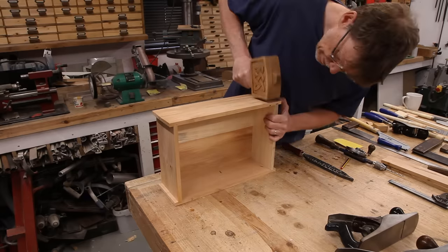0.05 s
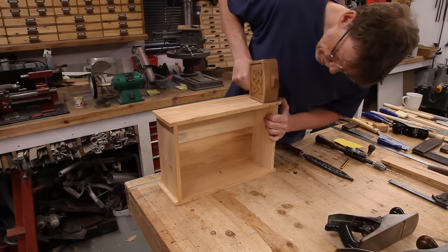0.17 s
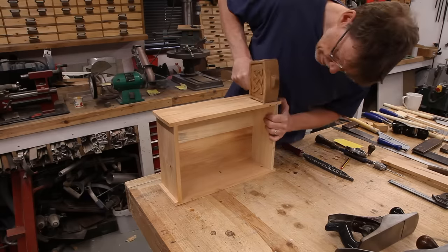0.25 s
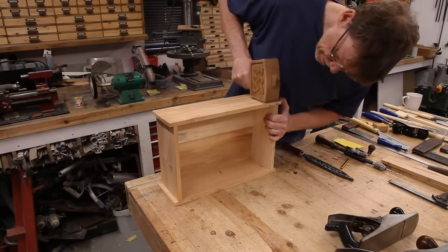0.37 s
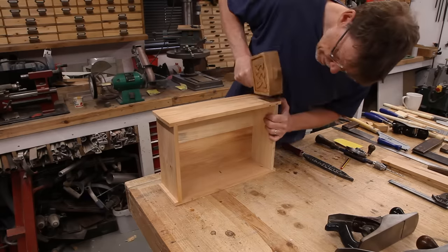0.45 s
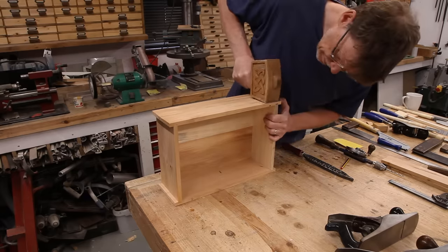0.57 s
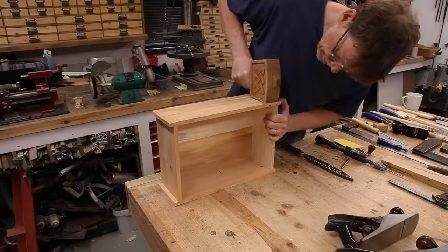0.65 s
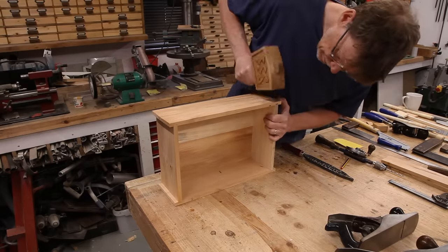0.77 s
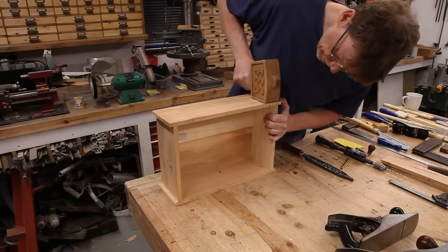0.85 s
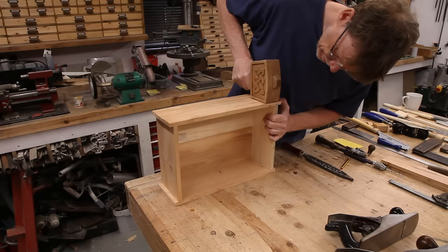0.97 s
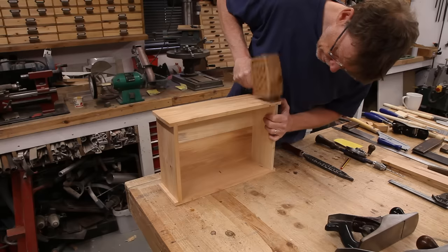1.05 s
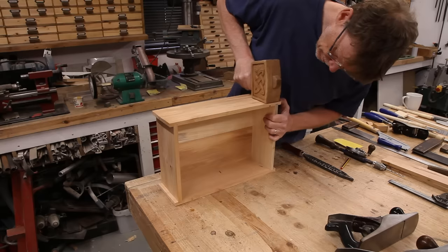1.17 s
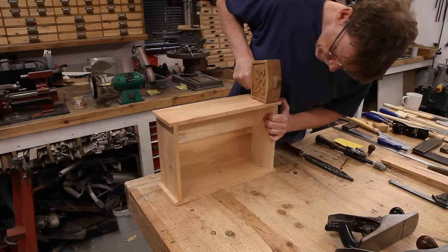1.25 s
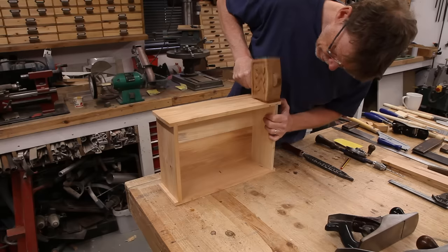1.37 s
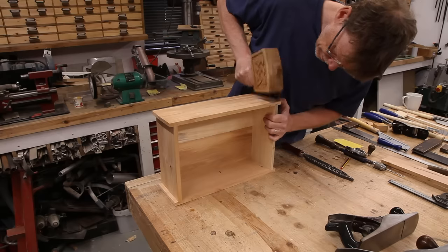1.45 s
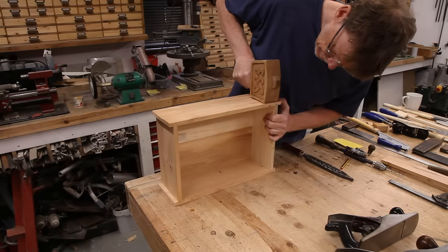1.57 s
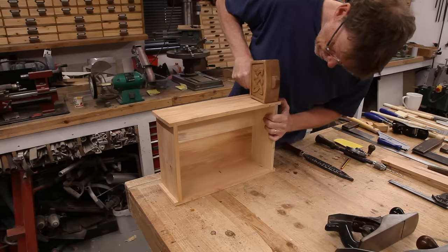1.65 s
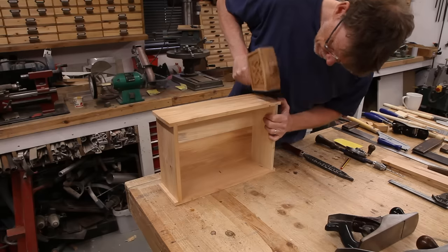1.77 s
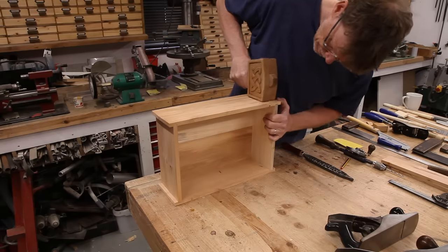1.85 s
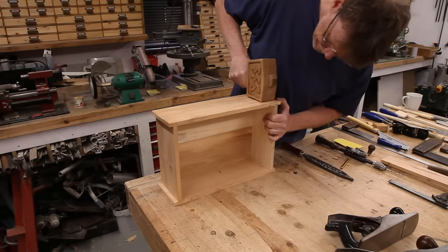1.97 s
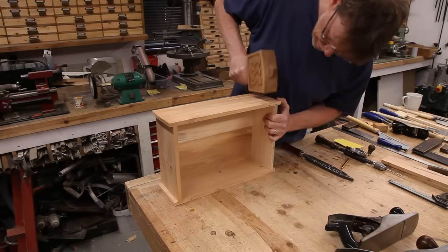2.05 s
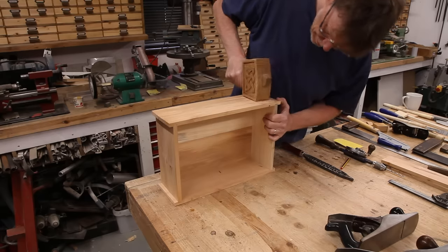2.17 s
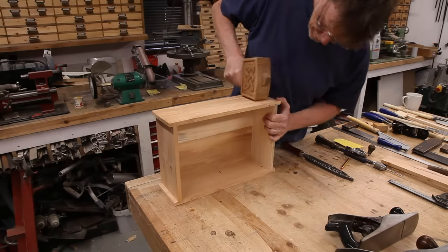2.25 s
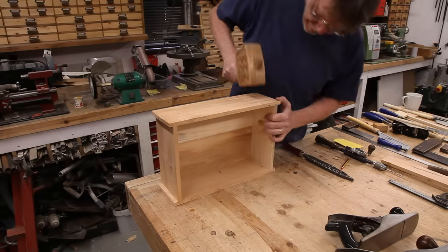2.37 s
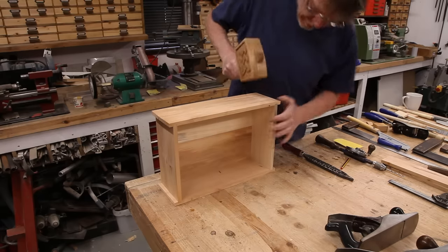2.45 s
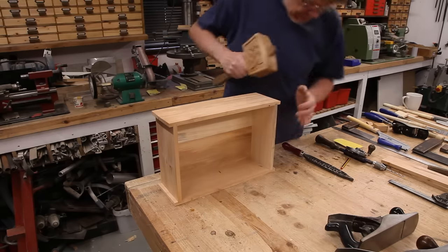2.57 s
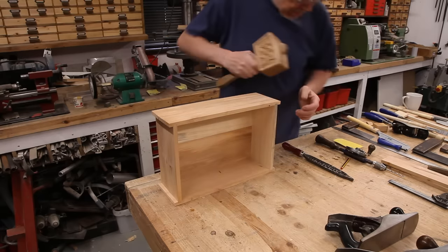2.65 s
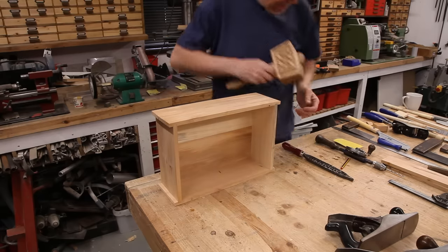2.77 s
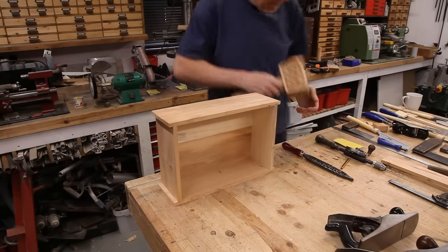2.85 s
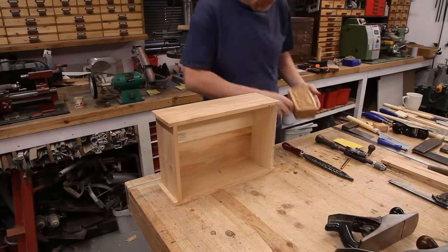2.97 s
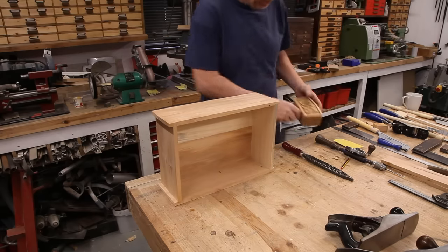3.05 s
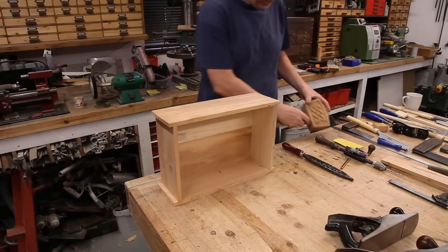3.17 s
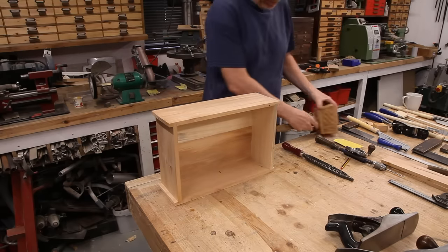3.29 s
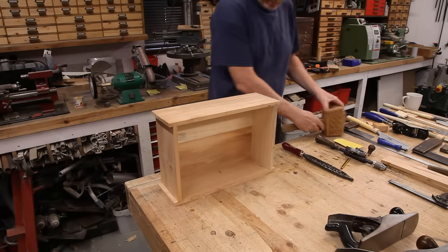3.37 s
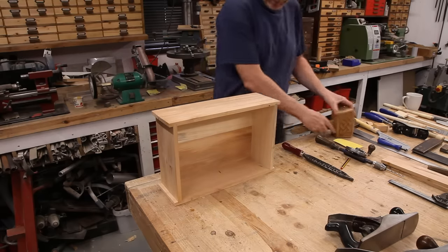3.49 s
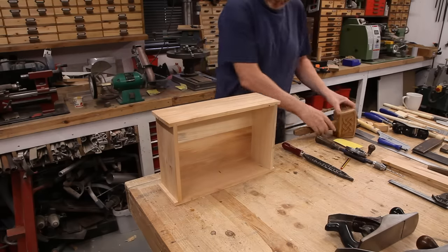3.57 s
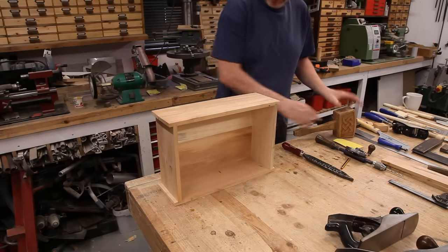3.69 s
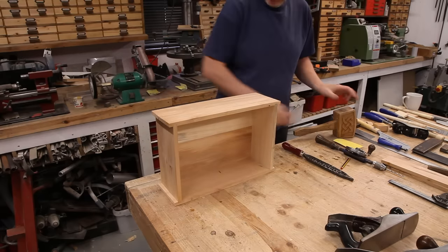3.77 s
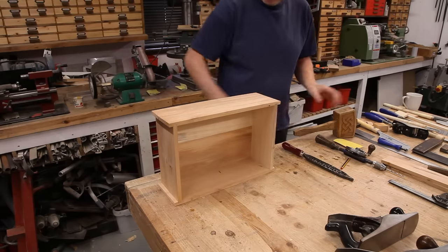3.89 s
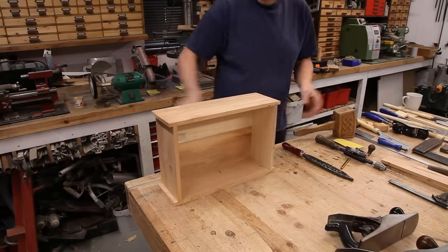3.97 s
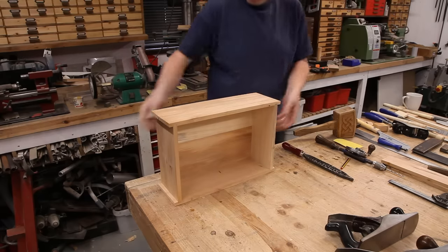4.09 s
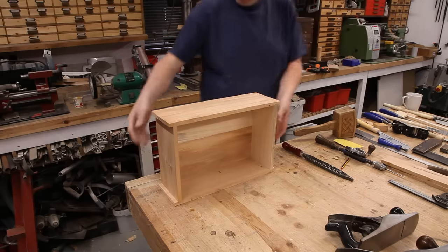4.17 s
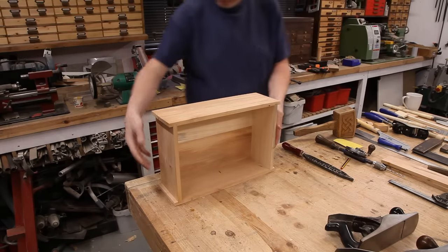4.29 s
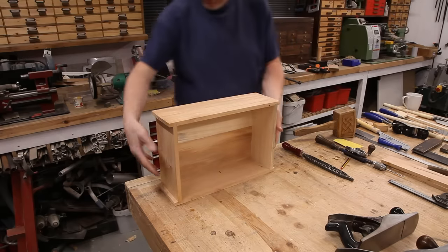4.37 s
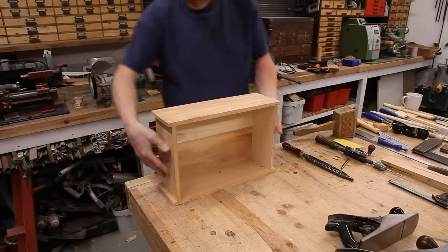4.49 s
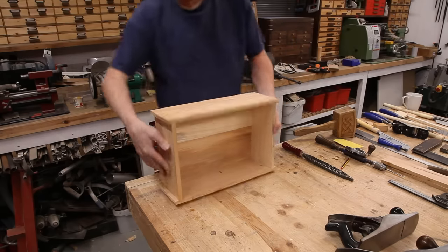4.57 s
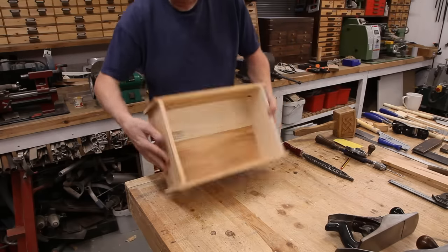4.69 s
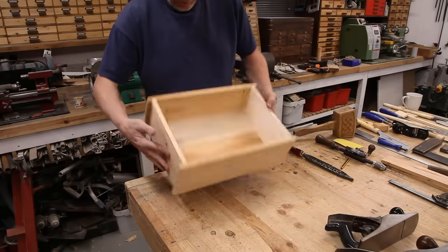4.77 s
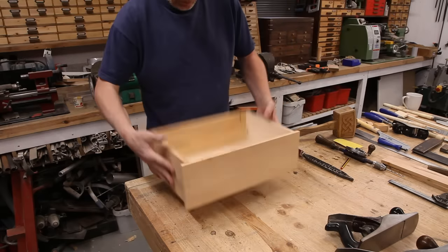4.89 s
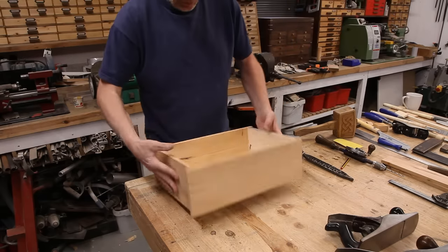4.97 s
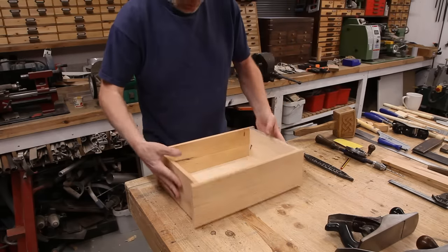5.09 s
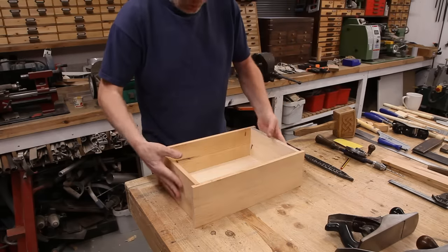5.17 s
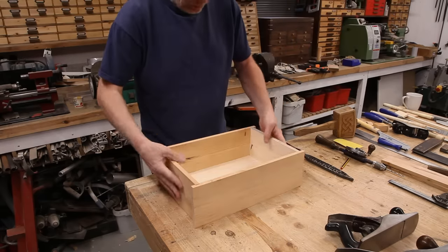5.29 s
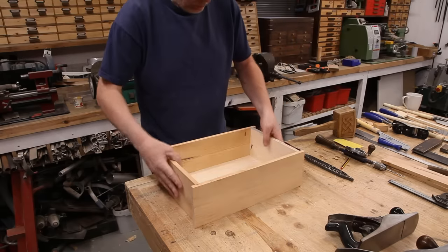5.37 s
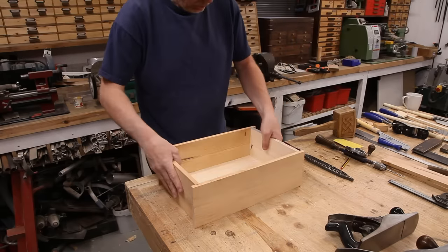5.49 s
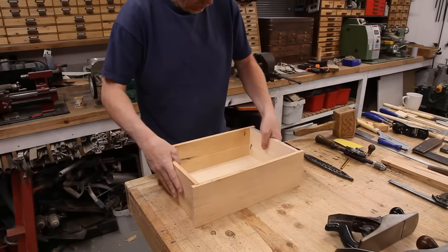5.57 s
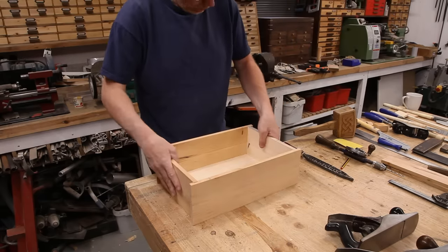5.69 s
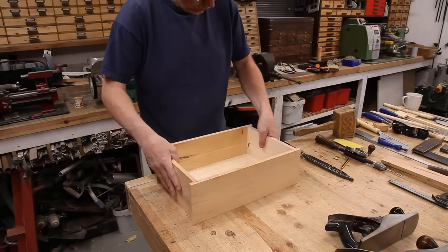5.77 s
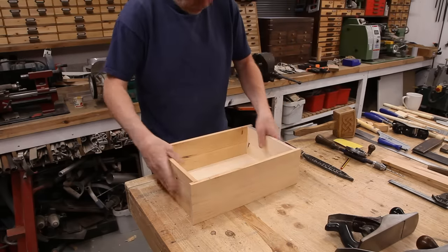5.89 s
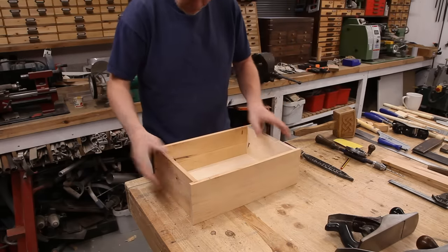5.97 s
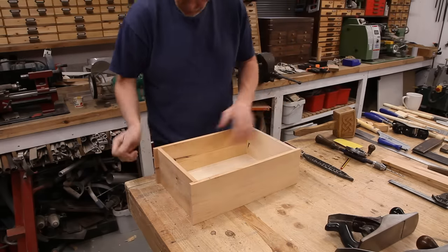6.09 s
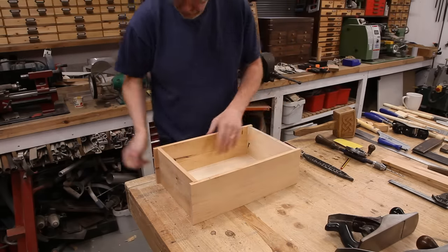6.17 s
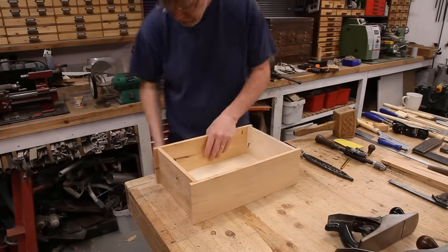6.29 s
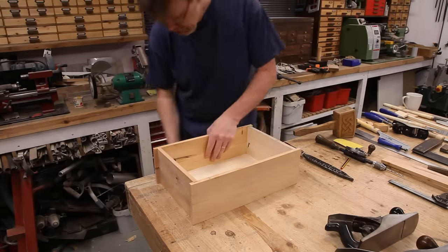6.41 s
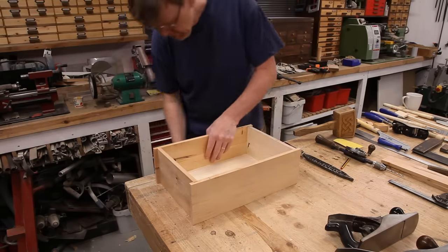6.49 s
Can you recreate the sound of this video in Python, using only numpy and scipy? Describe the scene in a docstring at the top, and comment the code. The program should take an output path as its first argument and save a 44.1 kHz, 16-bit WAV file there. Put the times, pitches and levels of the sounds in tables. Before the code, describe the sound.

A wooden mallet knocks a hollow pine box seven times in a workshop, is set down, then the box is tipped over with a loud clatter and slid.

```python
"""In a workshop a ballast hums faintly under hiss and rumble. A wooden mallet drives a board onto a pine box
seven times (force pulses and noise bursts through resonators), then is put down on the bench. Hands grip
the box (noise ticks, friction grains), dull contacts ring the bench top and a steel tool rings (a sine).
The box tips over onto the bench edge after edge, rocks back once and is slid about. The room answers knocks
and ticks with early echoes and a diffuse tail."""
import sys
import numpy as np
from scipy import signal
from scipy.fft import rfft, irfft, next_fast_len
from scipy.io import wavfile
from scipy.ndimage import uniform_filter1d

SR = 44100
rng = np.random.default_rng(int(sys.argv[2]) if len(sys.argv) > 2 else 0)


def master(y):
    """Save y as 16-bit WAV."""
    cut = np.clip(np.atleast_2d(y).T, -1, 1)
    pcm = np.round(cut * 32767)  # scale
    wavfile.write(sys.argv[1], SR, pcm.astype(np.int16))


N = 288414
T = np.arange(SR // 8) / SR  # time base of one contact, s

# Mallet blows. Each row: start in seconds, crack peak in dB, crack centre in Hz, board clack peak in dB,
# panel boom peak in dB; levels are dry, ahead of the capsule.
MALLET_BLOWS = [(.149, -2.5, 2960, -13, -9), (0.495, -2.5, 4724, -11.5, -10), (.822, -4, 2355, -10.5, -9.5),
                (1.1563, -0.6, 4940, -13, -11.5), (1.487, -5.5, 2940, -12, -11.5),
                (1.8387, -3.5, 3400, -11, -10), (2.116, -4.5, 2930, -10.5, -13)]


def amp(db):
    """Amplitude ratio of a level in dB."""
    return 10 ** (np.asarray(db) / 20)


def unit(x):
    """x scaled to an rms of 1."""
    return x / np.sqrt(np.mean(x ** 2) + 1e-20)


def peak(x, db):
    """x scaled to a peak level in dB."""
    return amp(db) * x / np.abs(x).max()


def along(points, hz):
    """Interpolate (Hz, value) points on a log frequency axis."""
    point_hz, value = np.transpose(points)
    return np.interp(np.log(hz + 1), np.log(point_hz + 1), value)


def add(track, start_s, x):
    """Mix x into the track from start_s, cut at the track's end."""
    k = round(start_s * SR)
    track[k:k + len(x)] += x[:len(track) - k]


def filtered(x, response):
    """Apply a complex response of frequency to x, zero-padded."""
    size = next_fast_len(len(x) + 8192)
    hz = np.fft.rfftfreq(size, 1 / SR)
    return irfft(rfft(x, size) * response(hz), size)[:len(x)]


def resonator(modes):
    """Causal response of parallel (Hz, width Hz, dB) modes, alternating in sign."""
    def response(f):
        total = 0
        for k, (mode_hz, width_hz, db) in enumerate(modes):
            damping = 1j * f * width_hz
            total = total + (-1) ** k * amp(db) * damping / (mode_hz ** 2 - f * f + damping)
        return total
    return response


def bandpass(x, hz, width_hz):
    """One resonance applied twice, for steeper skirts."""
    return filtered(x, lambda f: resonator([(hz, width_hz, 0)])(f) ** 2)


def background():
    """Microphone hiss and far rumble are shaped noise; the wavering ballast hum is narrow-band noise."""
    # Each row: centre in Hz, resonator width in Hz, level in dB rms.
    hum_bands = [(106, 18, -83.5), (180, 4.4, -89.5)]
    # Each row: frequency in Hz, relative density in dB per Hz.
    floor_colour = [(20, -22), (50, -15), (100, -16), (250, -8), (500, -22), (1500, -21), (3300, -21.5),
                    (6400, -21.5), (8500, -22), (11000, -35), (16000, -43)]
    floor_db_rms = -74
    out = np.zeros(N)
    for hz, width_hz, db_rms in hum_bands:
        out += amp(db_rms) * unit(bandpass(rng.standard_normal(N), hz, width_hz))
    floor = filtered(rng.standard_normal(N), lambda f: amp(along(floor_colour, f)))
    return out + amp(floor_db_rms) * unit(floor)


def push(lag_s, length_s):
    """The force while two faces stay in contact: one sin^2 pulse."""
    return np.sin(np.pi * np.clip((T - lag_s) / length_s, 0, 1)) ** 2


def burst(rise_s, length_s):
    """A few milliseconds of rough contact: noise that ends abruptly."""
    envelope = (1 - np.exp(-T / rise_s)) * np.exp(-(T / length_s) ** 2)
    return envelope * rng.standard_normal(len(T))


def room(x, wet_db, echo_hz=2500, blur=0.6, blur_hz=2500, dull_hz=6000):
    """Direct sound, first echoes, and a new diffuse tail in which each frequency dies at its own speed."""
    # Each row: frequency in Hz, t60 in seconds.
    decay_times = [(100, 0.76), (260, 0.46), (700, 0.49), (1840, 0.47), (4850, 0.43), (9000, 0.34),
                   (14000, 0.13)]
    # First echoes. Each row: delay in seconds, gain in dB ahead of the treble loss.
    wall_echoes = [(.005, -8), (.0085, -8.5), (0.015, -10.5), (0.023, -17), (.028, -23.5)]
    hz, t, z = signal.stft(rng.standard_normal(SR), SR, nperseg=256)
    decay = amp(-60 * t / along(decay_times, hz)[:, None])
    tail = signal.istft(z * decay, SR, nperseg=256)[1][:SR]

    # The walls hear all sides of the source: its treble colour evens out.
    energy_below = np.cumsum(np.abs(rfft(x, SR)) ** 2)
    bin_hz = np.arange(SR // 2 + 1)
    reach = 1 + blur * bin_hz * bin_hz / (bin_hz + blur_hz)
    upper = np.interp(bin_hz + reach, bin_hz, energy_below)
    lower = np.interp(bin_hz - reach, bin_hz, energy_below)
    colour = (upper - lower) / (2 * reach)

    tail = tail / np.linalg.norm(tail)
    out = amp(wet_db) * filtered(tail, lambda f: np.sqrt(np.interp(f, bin_hz, colour) / (1 + f / dull_hz)))
    out *= np.clip(np.arange(SR) / SR / 0.0059, 0, 1)  # tail builds up over 5.9 ms
    echo = filtered(x, lambda f: 1 / (1 + 1j * f / echo_hz))  # cluttered shelves scatter the treble
    add(out, 0, x)
    for delay_s, db in wall_echoes:
        add(out, delay_s, amp(db) * echo)
    return out


def box_knocks(rows, body, mix, spread):
    """A crack where wood meets wood, the clack of the boards and the slower boom of the panels."""
    out = np.zeros(N)
    snap_db, edge_db, lag_s, wet_db = mix
    for start_s, crack_db, crack_hz, clack_db, boom_db in rows:
        # No two knocks land alike.
        modes = [(hz, width_hz, db + rng.normal(0, 2.8)) for hz, width_hz, db in body]

        def ring(force, low_hz, high_hz):
            return filtered(force, resonator([m for m in modes if low_hz <= m[0] < high_hz]))

        boom = ring(push(lag_s, 0.0016), 0, 600)  # the panels take the force a little later
        clack_force = push(lag_s / 2, 0.00041) + 0.14 * burst(0.001, 0.0057)
        clack = ring(clack_force, 600, 1150)
        edge_force = push(0.0008, 0.00053) + 0.11 * burst(0.00094, 0.0023)
        edge = ring(edge_force, 1150, SR)
        crack = bandpass(burst(0.00058, 0.0032), crack_hz, spread * crack_hz)
        snap = bandpass(burst(0.00068, 0.0035), 7500, 7000)

        dry = peak(crack, crack_db)
        dry = dry + peak(snap, crack_db + snap_db)
        dry = dry + peak(edge, crack_db + edge_db)
        dry = dry + peak(clack, clack_db) + peak(boom, boom_db)
        add(out, start_s, room(dry, wet_db))
    return out


def mallet_blows():
    """The mallet drives the board on: knocks ring the upright box."""
    # Panels and boards. Each row: frequency in Hz, width in Hz, nominal level in dB.
    box_modes = [(82, 120, -11.5), (158.7, 72, -1), (188.7, 53, 1), (292.3, 24, 0), (344, 60, -2.5),
                 (464, 87, -3), (563.2, 34, -1), (688, 74, -2.5), (814, 150, -3), (940, 140, -3.5),
                 (1260, 61, -11), (1669, 98, -4), (1897, 300, -10.5), (2621, 140, -10)]
    # Snap over crack in dB, edge ring over crack in dB, panel lag in seconds, room tail gain in dB.
    blow_mix = (-3, -5.5, .0028, -7)
    return box_knocks(MALLET_BLOWS, box_modes, blow_mix, spread=1.0)


def after_ring():
    """One slow low mode outlasts every blow: a decaying sine, faded out within 1 s."""
    # Frequency in Hz, starting level in dB ahead of the onset, t60 in seconds ahead of the fade.
    low_mode = (199, -55, 3)
    hz, db, t60_s = low_mode
    t = np.arange(SR) / SR
    tone = amp(db - 60 * t / t60_s) * np.sin(2 * np.pi * hz * t)
    onset = 1 - np.exp(-t / 0.033)
    fade = np.cos(np.pi * t / 2)
    out = np.zeros(N)
    for row in MALLET_BLOWS:
        add(out, row[0], tone * onset * fade)
    return out


def ticks():
    """Tiny hard contacts of wood and fingers: noise bursts, each with its own colour."""
    # Each row: start in seconds, dry peak in dB ahead of the capsule, centre in Hz, resonator width in Hz.
    tick_rows = [(2.44, -49, 6960, 8930), (2.51, -56, 2000, 2990), (2.60, -56, 6700, 9000),
                 (2.825, -45, 3400, 5020), (3.482, -56, 2600, 4000), (4.205, -36.5, 7500, 9870),
                 (4.58, -37.5, 4650, 1980), (4.846, -33, 1264, 442.7), (5.90, -49.5, 1000, 1506)]
    out = np.zeros(N)
    for start_s, db, hz, width_hz in tick_rows:
        tick = bandpass(burst(0.00074, 0.0032), hz, width_hz)
        add(out, start_s, room(peak(tick, db), wet_db=-3.5))
    return out


def grains(spiky_db, patchy_db):
    """Dense uneven friction noise whose colour shifts in patches as the contact moves."""
    roughness = unit(uniform_filter1d(rng.standard_normal(N), size=90))
    x = rng.standard_normal(N) * amp(spiky_db * roughness)
    z = signal.stft(x, nperseg=512)[2]
    field = uniform_filter1d(rng.standard_normal(z.shape), size=7, axis=0)
    field = uniform_filter1d(field, size=7, axis=1)
    return signal.istft(z * amp(patchy_db * unit(field)), nperseg=512)[1][:N]


def rubbing():
    """Strokes of hands, cloth and wood: friction grains as a dry hiss and a part that sounds through the box."""
    # Each row: start in seconds, rise in seconds, hold in seconds, hiss level in dB,
    # share through the box in dB over the hiss.
    strokes = [(2.475, 0.028, 0.0064, -63.5, -2), (2.818, 0.011, .003, -68.5, -16),
               (2.86, .035, 0.0064, -73, -1), (3.116, 0.0095, .03, -50.5, -9),
               (3.16, .04, 0.047, -68.5, -2), (3.27, 0.015, .01, -63.5, -15),
               (3.334, 0.084, .01, -59.5, -14), (3.467, .014, 0.03, -55.5, 1.5),
               (4.019, .12, .06, -76.5, -3), (4.195, 0.0083, .005, -56, -10.5),
               (4.287, 0.12, .05, -57, -1.5), (4.44, 0.052, 0.043, -61, 1), (4.5, .075, .02, -53.5, -0.5),
               (4.64, 0.037, 0.062, -45.5, -8.5), (4.739, .06, .14, -49.5, -7.5),
               (5.241, 0.13, 0.064, -54, -3), (5.428, 0.036, 0.017, -57, -0.5),
               (5.534, 0.097, 0.078, -46.5, -3), (5.816, 0.038, 0.075, -59, -2.5),
               (5.959, 0.05, 0.12, -60.5, -7), (6.189, 0.041, 0.048, -62.5, -2.5),
               (6.268, 0.027, 0.016, -61, -4), (6.333, .035, 0.029, -51.5, -4),
               (6.414, .03, .07, -63.5, -4.5)]
    # Hiss colour. Each row: frequency in Hz, relative density in dB per Hz.
    skin_colour = [(710, -47.5), (1200, -9.5), (1610, -3), (2790, -6), (3050, -3.5), (3950, -7), (6720, -7),
                   (8530, -12.5), (16000, -44)]
    # The box under rubbing. Each row: frequency in Hz, width in Hz, level in dB.
    slide_modes = [(200, 39, -0.5), (521, 84, 1), (797, 130, 0), (1074, 75, 0.5), (1730, 130, -2),
                   (2070, 28, 0.5), (2630, 89, -1), (2910, 120, -6), (3220, 310, -15), (4030, 43, -1)]
    rise_db, fade_db_per_s = 18.5, 211  # a stroke swells by this much, holds, then dies away
    t = np.arange(N) / SR
    hiss = unit(filtered(grains(spiky_db=1.0, patchy_db=2.5), lambda f: amp(along(skin_colour, f))))
    wood = unit(filtered(grains(spiky_db=1.0, patchy_db=4), resonator(slide_modes)))
    dry_power, boxed_power = np.zeros(N), np.zeros(N)
    for start_s, rise_s, hold_s, db, share_db in strokes:
        swell = amp(rise_db * np.clip((t - start_s) / rise_s - 1, -1, 0)) * (t > start_s)
        fade_s = np.maximum(t - start_s - rise_s - hold_s, 0)
        power = (swell * amp(db - fade_db_per_s * fade_s)) ** 2
        dry_power += power
        boxed_power += power * amp(2 * share_db)
    return np.sqrt(dry_power) * hiss + np.sqrt(boxed_power) * wood


def bench_thumps():
    """Dull contacts ring the bench top; the shorter the contact, the higher the modes it reaches."""
    # Each row: start in seconds, dry peak in dB ahead of the capsule, contact time in seconds.
    thumps = [(3.281, -26, .003), (3.329, -31.5, 0.006), (3.342, -37, .0033), (3.392, -19, 0.00069),
              (3.652, -41.5, 0.0036), (3.689, -47.5, 0.0059), (3.758, -51.5, 0.0038), (3.807, -56, 0.0048),
              (4.236, -55.5, 0.0016), (4.553, -43, 0.0046)]
    # Each row: frequency in Hz, width in Hz, level in dB.
    bench_modes = [(90, 100, -11.5), (165.5, 53, -3.5), (214, 27, 1), (250, 57, -1.5), (305.6, 45, -2.5),
                   (464.7, 100, 0), (689, 190, 0), (932, 160, 0.3), (1190, 110, 0.7), (1480, 1200, -7),
                   (1955, 730, -5), (2790, 340, -7)]
    out = np.zeros(N)
    for start_s, db, contact_s in thumps:
        knock = filtered(push(0, contact_s), resonator(bench_modes))
        add(out, start_s, room(peak(knock, db), wet_db=-5.0))
    return out


def tool_ring():
    """A steel tool on the bench rings: one decaying sine with a soft onset."""
    # Start in seconds, frequency in Hz, starting level in dB ahead of onset and capsule, t60 in seconds.
    jangle = (3.51, 2450, -57, .42)
    start_s, hz, db, t60_s = jangle
    t = np.arange(SR // 2) / SR
    tone = amp(db - 60 * t / t60_s) * np.sin(2 * np.pi * hz * t)
    out = np.zeros(N)
    add(out, start_s, tone * (1 - np.exp(-t / 0.0031)))
    return out


def box_landing():
    """The box lands on the bench edge after edge, then rocks back once: knocks ring the lying box."""
    # Each row: start in seconds, crack peak in dB, crack centre in Hz, board clack peak in dB,
    # panel boom peak in dB; levels are dry, ahead of the capsule.
    landing = [(4.9482, -14, 1482, -8.5, -10), (4.9503, -2, 3190, -7.5, -8.5),
               (4.9535, -8, 2128, -13, -15.5), (4.957, -14.5, 3395, -16, -21),
               (4.9615, -16.5, 2792, -17.5, -22.5), (4.965, -17, 4514, -19, -21),
               (4.969, -16, 3920, -12.5, -21.5), (4.9745, -20.5, 2992, -20.5, -26),
               (5.124, -20.5, 3110, -26.5, -30), (5.128, -28, 2470, -18, -20.5),
               (5.146, -38, 1790, -31, -24.5)]
    # The box lying on the bench. Each row: frequency in Hz, width in Hz, nominal level in dB.
    laid_modes = [(90, 260, -19), (202, 57.6, -7), (335.5, 38, -7), (400, 15, 2.5), (480, 120, -7.5),
                  (640, 93, -3), (770, 210, 0), (1080, 110, -8), (1294, 200, -0.5), (1710, 92, -1.5),
                  (2083, 110, 0.5), (2688, 120, -11)]
    # Snap over crack in dB, edge ring over crack in dB, panel lag in seconds, room tail gain in dB.
    landing_mix = (-2, 0, .0011, -9)
    return box_knocks(landing, laid_modes, landing_mix, spread=0.9)


def microphone(hz):
    """A small capsule: thin bass, dull top; minimum phase, so nothing smears ahead of a blow."""
    # Each row: frequency in Hz, gain in dB.
    capsule_gain = [(25, -24), (100, -15), (170, -4), (300, 1), (7000, -0.5), (9500, -11.5), (13000, -21),
                    (16000, -24)]
    cepstrum = irfft(np.log(amp(along(capsule_gain, hz))))
    half = len(cepstrum) // 2
    fold = np.r_[1, np.full(half - 1, 2), 1, np.zeros(len(cepstrum) - half - 1)]
    return np.exp(rfft(cepstrum * fold))


def scene():
    """Knocks, ticks and tool pass the capsule's colour; after-ring, friction and background bypass it."""
    struck = mallet_blows() + ticks() + bench_thumps() + tool_ring() + box_landing()
    return (background() + filtered(struck, microphone) + after_ring() + rubbing())[None]


def record(dry):
    """Peaks are limited at full scale, then everything from the band limit up is removed."""
    top_hz = 16480
    limited = dry[0] / (1 + np.abs(dry[0]) ** 40) ** (1 / 40)
    return filtered(limited, lambda hz: hz < top_hz)[None]


dry = scene()
out = record(dry)
master(out)
```